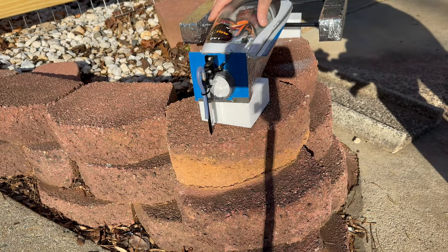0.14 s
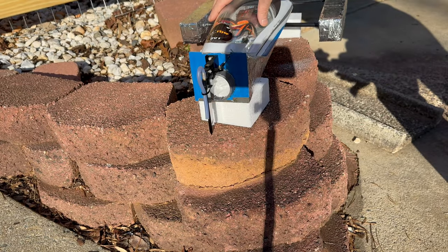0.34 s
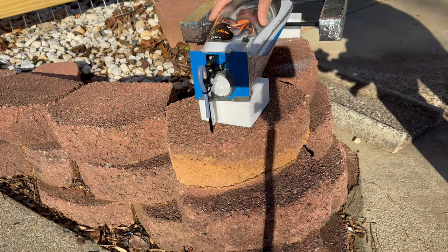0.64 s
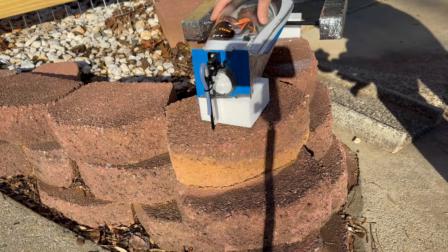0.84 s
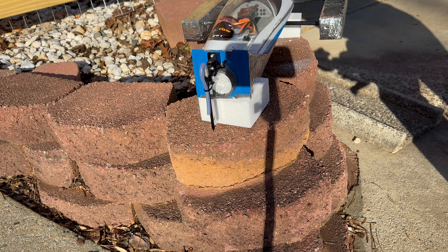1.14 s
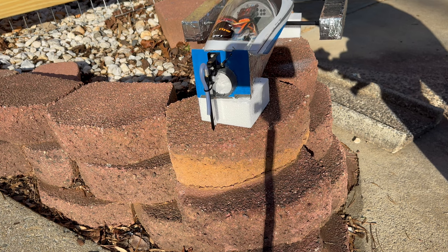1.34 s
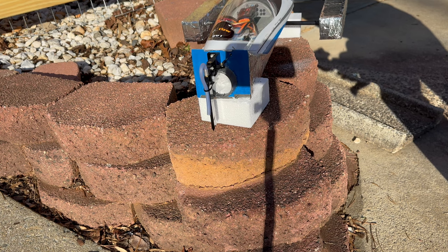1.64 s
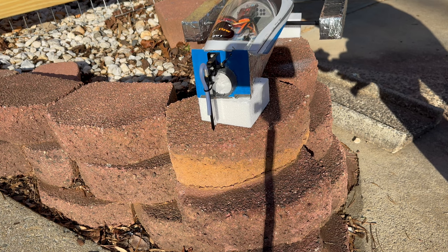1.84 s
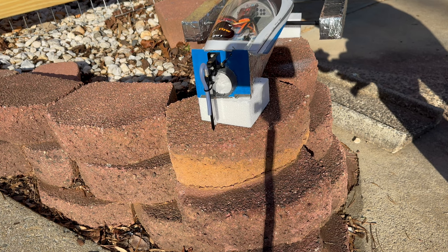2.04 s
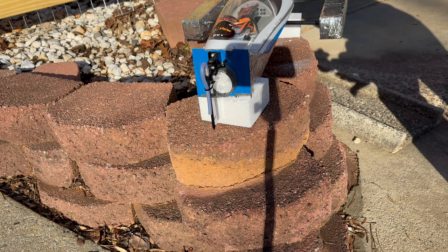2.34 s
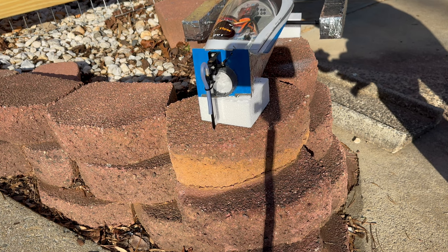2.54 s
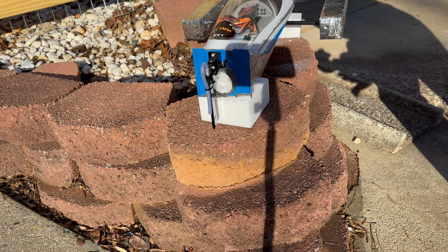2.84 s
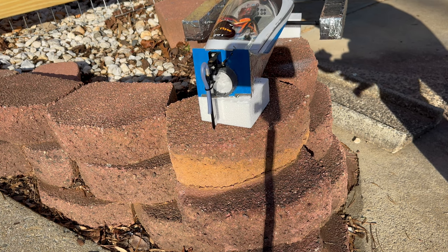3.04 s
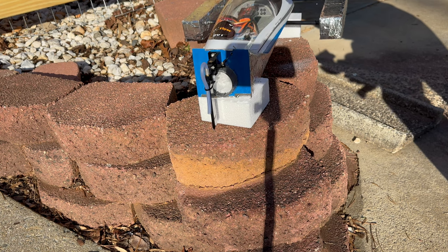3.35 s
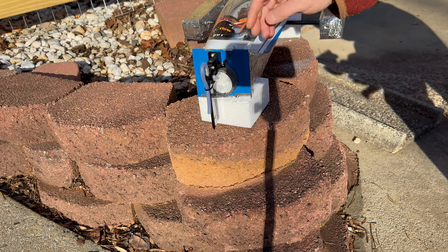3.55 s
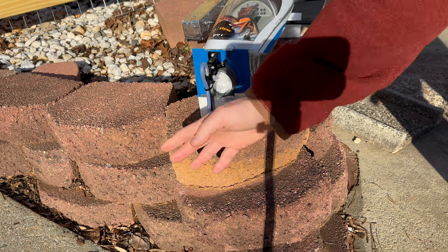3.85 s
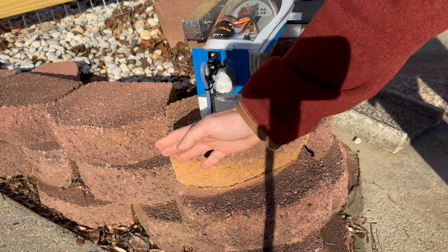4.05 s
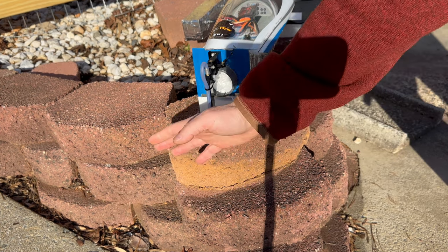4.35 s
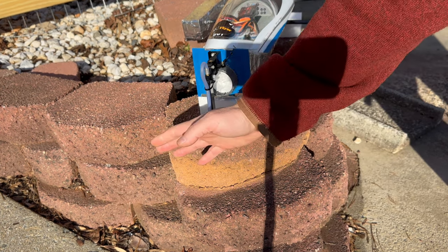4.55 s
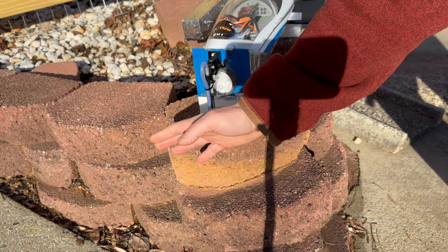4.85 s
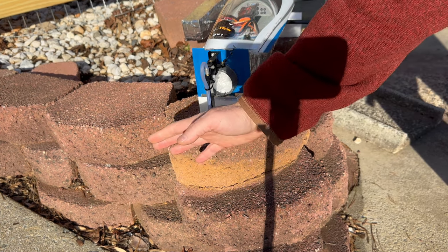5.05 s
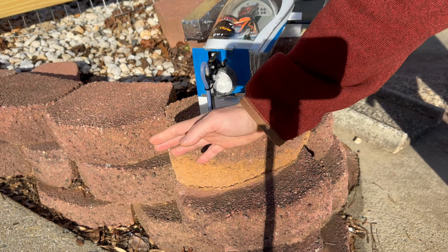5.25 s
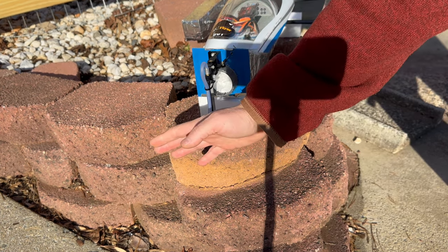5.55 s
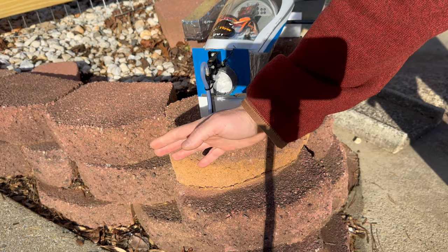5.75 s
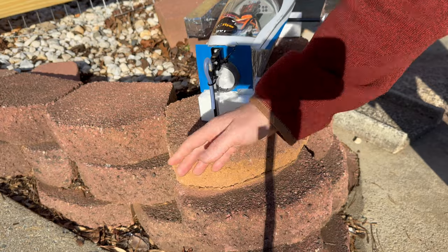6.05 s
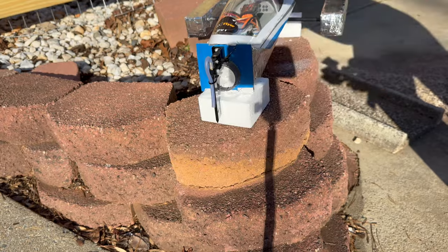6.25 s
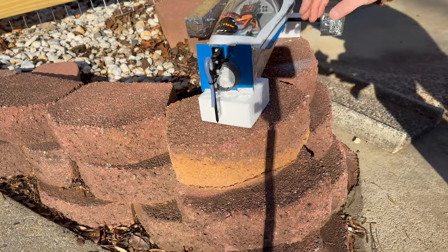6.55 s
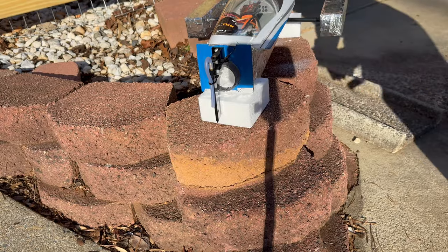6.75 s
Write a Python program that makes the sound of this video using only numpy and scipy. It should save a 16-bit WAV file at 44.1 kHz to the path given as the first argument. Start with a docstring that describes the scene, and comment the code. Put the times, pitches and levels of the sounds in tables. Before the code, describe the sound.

A small electric ducted fan whines and rushes up to full speed, coasts down and repeats three times outdoors, with wind rumbling on the microphone.

```python
"""A small electric ducted fan, standing on a stone wall outdoors, is throttled up and down three times.
The unbalanced rotor hums once per turn and turbulent air rushes through the resonant duct.
The motor's cogging whines as it spins up and coasts to rest; its speed controller whistles above.
The motor mount rings as the rotor jerks, and a hand in the airstream recolours the rush.
Breeze, gusts and sharp puffs rumble on the two microphone ports, over filtered background noise."""
import sys
import numpy as np
from scipy import signal
from scipy.fft import rfft, irfft
from scipy.io import wavfile
from scipy.ndimage import uniform_filter1d

SR = 44100
rng = np.random.default_rng(int(sys.argv[2]) if len(sys.argv) > 2 else 0)


def transcribe(u):
    """Save the signal u as a 16-bit wav file named by the first command-line argument.

    u: samples, shape (n,) or (channels, n), limited to [-1, 1]; the rate is SR.
    q: integer samples, one column per channel.
    """
    v = np.clip(np.atleast_2d(u).T, -1, 1)
    q = np.round(v * 32767).astype(np.int16)
    wavfile.write(sys.argv[1], SR, q)


N = 303540
TIME = np.arange(N) / SR
BINS_HZ = np.maximum(np.fft.rfftfreq(N, 1 / SR), 1)


def from_db(db):
    """Logarithmic level: decibels to amplitude gain."""
    return 10 ** (np.asarray(db) / 20)


def rms_one(x):
    """Normalisation: scale a signal to unit rms."""
    return x / np.sqrt(np.mean(x ** 2) + 1e-20)


def in_time(rows):
    """Linear interpolation: the columns of a time curve at every sample."""
    seconds, *columns = np.transpose(rows)
    return [np.interp(TIME, seconds, column) for column in columns]


def at_hz(rows, hz):
    """Interpolation on a logarithmic pitch axis: the columns of a spectrum at the given frequencies."""
    points, *columns = np.transpose(rows)
    log_hz = np.log(np.maximum(hz, 1))
    return [np.interp(log_hz, np.log(points), column) for column in columns]


def at_speed(rows, speed):
    """Linear interpolation: the columns of a table at the given rotor speeds."""
    points, *columns = np.transpose(rows)
    return [np.interp(speed, points, column) for column in columns]


def by_power(driven, driven_db, coasting_db):
    """Linear blend between the level under power and the level when coasting."""
    return coasting_db + driven * (driven_db - coasting_db)


def drift(rate_hz):
    """Low-pass filtered noise: slow random wandering with standard deviation 1."""
    spectrum = rfft(rng.standard_normal(N))
    return rms_one(irfft(spectrum / (1 + (BINS_HZ / rate_hz) ** 2), N))


def panned(x, balance_db):
    """Intensity stereo: split a left-right level difference evenly between the channels."""
    return x * from_db(np.array([balance_db, -balance_db]).reshape(2, -1) / 2)


def ring(force, hz, t60):
    """Damped resonator: a unit impulse sets a sine of initial height 1 decaying by 60 dB in t60 seconds."""
    radius = from_db(-60 / (t60 * SR))
    angle = 2 * np.pi * hz / SR
    feedback = [1, -2 * radius * np.cos(angle), radius * radius]
    return signal.lfilter([0, np.sin(angle)], feedback, force + 1e-18)


def port_difference(hz):
    """Partial coherence: sizes of the phase-shifted and the diffuse part of the port difference."""
    # the ports hear the sound out of step: (frequency [Hz], difference over sum [dB])
    port_width = [(60, -12), (150, -10), (380, -14), (750, -9), (1300, -11), (2400, -8), (3400, -3.5),
                  (4600, -3.5), (8100, 3), (10500, -2), (15000, -4)]
    steady_share = 0.62  # share of the difference power that is a steady phase shift
    width = from_db(at_hz(port_width, hz)[0])
    return width * np.sqrt(steady_share), width * np.sqrt(1 - steady_share)


def stereo_noise(colour_db, band=slice(None)):
    """Filtered Gaussian noise at two ports; the part common to both has unit rms inside the band."""
    # the sound sits a little to the left: (frequency [Hz], left-right level [dB])
    port_balance = [(60, 0), (150, 1), (380, 2), (750, 5.5), (1400, 1.5), (4000, 0.5), (15000, 0)]
    common, apart = rfft(rng.standard_normal((2, N))) * from_db(colour_db)
    shifted, diffuse = port_difference(BINS_HZ)
    # the port that leads alternates with frequency
    lead = np.cos(np.pi * np.log2(BINS_HZ)) * np.sqrt(2)
    side = 1j * shifted * common * lead + diffuse * apart
    ports = panned(np.array([common + side, common - side]), at_hz(port_balance, BINS_HZ)[0])
    return irfft(ports, N) * N / np.sqrt(2 * np.sum(np.abs(common[band]) ** 2))


def tone(hz, blur_hz):
    """Phase is the integral of frequency: a trembling stereo sine; the mean of its ports has rms 1."""
    phase = 2 * np.pi * np.cumsum(hz + blur_hz * drift(60)) / SR
    side = port_difference(hz)[0] * np.cos(phase)
    return np.sqrt(2) * (np.sin(phase) + np.array([-side, side]))


def throttle():
    """Drag and inertia: the drive sets the speed until each cut, then drag runs the rotor down to rest.
    Returns the speed, power on (0-1), fan level offset and hum level offset in dB."""
    # rotor speed under power, cut at the last point: (time [s], speed [turns/s])
    first_run = [(0, 246), (.06, 285), (.2, 458), (.3, 579), (.36, 639), (.42, 680), (.48, 711), (.55, 721),
                 (.652, 724)]
    second_run = [(1.335, 48), (1.385, 39.5), (1.425, 48), (1.51, 138), (1.6, 185), (1.65, 217),
                  (1.72, 325), (1.93, 600), (2.0, 660), (2.07, 705), (2.15, 724), (2.622, 724)]
    third_run = [(3.81, 1), (3.92, 141), (4.0, 170), (4.05, 208), (4.1, 278), (4.26, 392), (4.4, 441),
                 (4.5, 452), (4.83, 447), (4.93, 483), (5.0, 491), (5.1, 480), (5.33, 513), (5.44, 542),
                 (5.56, 543), (5.64, 558), (5.77, 653), (5.85, 702), (5.92, 721), (6.003, 720)]
    # (speed curve, drive engages [s], coasting time [s], fan level when coasting [dB], hum level [dB])
    runs = [
        (first_run, 0, 0.97, 0.5, 0.8),
        (second_run, 1.44, 0.97, 0, -0.5),
        (third_run, 3.805, 0.935, -1.84, -0.5),
    ]
    coast_power = 2.23  # coasting speed goes as the time left raised to this power
    speed, driven, coasting_db, hum_db = np.zeros((4, N))
    for curve, engage_s, coast_s, run_coasting_db, run_hum_db in runs:
        start_s = curve[0][0]
        cut_s, top_speed = curve[-1]
        time_left = np.clip(1 - (TIME - cut_s) / coast_s, 0, 1)
        coast = top_speed * time_left ** coast_power
        run_speed = np.where(TIME < cut_s, in_time(curve)[0], coast)
        speed = np.where(TIME < start_s, speed, run_speed)
        driven = np.where(TIME < engage_s, driven, TIME < cut_s)
        coasting_db = np.where(TIME < cut_s, coasting_db, run_coasting_db)
        hum_db = np.where(TIME < start_s, hum_db, run_hum_db)
    driven = uniform_filter1d(driven, size=500)
    speed = np.maximum(uniform_filter1d(speed, size=900), 1)  # inertia rounds every change
    return speed, driven, coasting_db * (1 - driven), hum_db


def hand_share():
    """Partial obstruction of a jet: how far the hand is in the airstream (0-1)."""
    # (time [s], share in the airstream [0-1])
    hand_curve = [(3.6, 0.02), (3.9, 1), (5.5, 0.71), (6.05, 0), (6.3, 0.35)]
    return np.clip(in_time(hand_curve)[0], 0, 1)


def rotor(speed, driven):
    """Forced vibration: unbalance shakes the housing once per turn, with speed-dependent weak overtones."""
    # once-per-turn hum: (speed [turns/s], base level [dB], base left-right level [dB])
    hum_levels = [(199, -67.5, 8), (330, -52, 2), (383, -49, 7), (406.6, -33.5, 5), (441, -34.5, 2.5),
                  (479.3, -22.5, 3.5), (515, -15.5, 2), (600, -13.5, 0), (696, -14, 3.5), (704, -16.5, 4),
                  (727, -19.5, 2)]
    # (multiple of the speed, then the base level [dB] at each of the overtone speeds)
    overtones = [(2, -80, -49, -48, -47, -43), (3, -80, -51, -39, -37, -39), (6, -80, -60, -53, -51, -52),
                 (9, -80, -62, -56, -54, -46), (12, -80, -49, -46, -52, -39)]
    # speeds at which the overtone levels are given [turns/s]
    overtone_speeds = [330, 460, 550, 660, 720]
    hum_coasting_db, hum_hand_db = -0.5, 5.5  # change with the power off; with the hand in the airstream
    overtone_hand_db = 2  # the hand brings the overtones out

    hand = hand_share()
    level_db, balance_db = at_speed(hum_levels, speed)
    level_db = level_db + hum_coasting_db * (1 - driven) + hum_hand_db * hand
    hum = panned(tone(speed, blur_hz=0.4), balance_db + 0.6 * drift(4.2))
    out = hum * from_db(level_db + 0.15 * drift(25))
    for multiple, *levels_db in overtones:
        overtone_db = np.interp(speed, overtone_speeds, levels_db)
        overtone_db = overtone_db + overtone_hand_db * hand + 3 * drift(22)
        overtone = tone(multiple * speed, blur_hz=4) * from_db(overtone_db)
        out = out + overtone * (speed > overtone_speeds[0])
    return out


def rush(speed, driven):
    """Turbulence excites duct resonances: broadband noise grows with rotor speed and changes its colour."""
    # colour: (frequency [Hz], relative density idling [dB per Hz], at half speed, at full speed)
    rush_colour = [(102, -5, -6.5, -7.5), (248, 9.5, 10.5, 3.5), (340, 3, -0.5, 1), (613, 17.5, 14.5, 12),
                   (734, 7.5, 4.5, 1), (1510, 8, 6.5, 6.5), (2310, 8.5, 3, 2), (3100, 6, 7.5, 2.5),
                   (4756, -3.5, 2, 2), (6620, -1.5, -3, 2), (7860, -11, -5.5, -5.5), (9930, -1, 4.5, 4),
                   (13300, -12.5, -1.5, -0.5), (15700, -14, -6, -4.5)]
    # the three speeds of those colours [turns/s]
    colour_speeds = [240, 461.6, 727]
    # resonances and hollows of the duct: (centre [Hz], width [Hz], gain [dB])
    duct_modes = [(1930, 210, 0), (2050, 320, 3), (2380, 68, 3.5), (2645, 88, 5.5), (3070, 400, -6.5),
                  (3063, 110, 9.5), (3257, 100, 5), (3710, 110, -6.5), (4220, 150, 3), (4670, 720, 1),
                  (5160, 230, -3.5), (5750, 1300, 1.5)]
    # (speed [turns/s], base 3.5-7 kHz level driven [dB], the same coasting [dB], treble gain less 4 dB [dB])
    air_levels = [(1, -99, -102, -4), (60, -70.5, -77.5, -1), (163, -62, -67, -2), (261, -54, -57, -2),
                  (415.6, -40.5, -44, -6.5), (501.7, -34.5, -37.5, -7.5), (652, -30, -29, -7),
                  (782, -25.5, -26.5, -8.5)]

    driven_db, coasting_db, treble_db = at_speed(air_levels, speed)
    duct_db = sum(db / (1 + (2 * (BINS_HZ - hz) / width) ** 2) for hz, width, db in duct_modes)
    reference = (BINS_HZ > 3500) & (BINS_HZ < 7000)
    air = 0
    for colour_db, stage in zip(at_hz(rush_colour, BINS_HZ), np.eye(len(colour_speeds))):
        share = np.interp(speed, colour_speeds, stage)  # power share of this colour
        air = air + np.sqrt(share) * stereo_noise(colour_db + duct_db, reference)
    treble_filter = signal.butter(4, 8000, "high", fs=SR, output="sos")
    hiss = signal.sosfiltfilt(treble_filter, air)
    air = air + hiss * (from_db(treble_db + 4.0) - 1)
    # the wake pulses once per turn and flutters at random
    turn = np.sin(2 * np.pi * np.cumsum(speed) / SR)
    level_db = by_power(driven, driven_db, coasting_db) + 0.67 * drift(40)
    return air * from_db(level_db) * (1 + 0.066 * turn)


def motor(speed, driven):
    """Cogging torque: magnets passing stator slots give gliding tones that swell at housing resonances.
    Under power one tone leads; the free rotor rattles with many."""
    # magnetic and bearing tones: (multiple of the speed, relative level coasting [dB], driven [dB])
    cogging = [(3, -20, -20), (6, -7, -15), (9, 1, 0), (10, -4, -15), (12, -8, -17), (18, -4, -7),
               (24, -26, -14), (27, -12, -18), (36, -9, -15), (72, -29, -32)]
    # whine: (speed [turns/s], base level driven [dB], coasting [dB])
    whine_levels = [(1, -69, -78), (10, -50, -39), (25, -44, -47.5), (50, -49, -50.5), (95, -50.5, -58),
                    (164.6, -50.5, -53.5), (168, -38, -54.5), (223, -42, -52.5), (318, -39, -43),
                    (420, -47, -49.5), (724, -52, -49)]
    # radiation of vibration by the housing: (frequency [Hz], gain [dB])
    housing = [(250, -73), (450, -9), (620, -4.5), (820, 13), (1050, -1.5), (1400, -5.5), (1900, -0.5),
               (2900, -6), (3500, -12.5), (4700, -18.5), (5900, -7.5), (8000, -15.5), (9800, -14),
               (10400, 2.5), (11200, -12.5), (16000, -15.5)]

    turn = 2 * np.pi * np.cumsum(speed) / SR
    # the rotor runs slightly off centre, so each tone flutters once per turn
    wobble = np.interp(driven, [0, 1], [0.4, 0.3])
    out = 0
    for multiple, coasting_db, driven_db in cogging:
        hz = multiple * speed
        level_db = by_power(driven, driven_db, coasting_db) + at_hz(housing, hz)[0]
        flutter = 1 + wobble * np.sin(turn + rng.uniform(0, 2 * np.pi))
        partial = tone(hz, blur_hz=0.003 * hz + 6)
        out = out + partial * from_db(level_db + 3.8 * drift(28)) * flutter
    return out * from_db(by_power(driven, *at_speed(whine_levels, speed)))


def controller(speed, driven):
    """Intermodulation: switching mixes with rotation into whistles that fall as the rotor speeds up."""
    # whistles below the switching rate: (multiple of the speed, relative level [dB])
    sidebands = [(6, -15), (12, 0), (18, -19)]
    # (speed [turns/s], base whistle level driven [dB], coasting [dB])
    whistle_levels = [(1, -80, -100), (25, -76, -80), (110, -62, -77), (180, -70, -74), (293, -47, -64),
                      (393, -64.5, -60)]
    # faint steady tones of the electronics: (frequency [Hz], base level [dB])
    electronics = [(5920, -83.5), (9430, -77.5)]
    switching_hz = 16000

    whistle_db = by_power(driven, *at_speed(whistle_levels, speed)) + 3 * drift(30)
    whistles = sum(from_db(db) * tone(switching_hz - multiple * speed, blur_hz=60)
                   for multiple, db in sidebands)
    steady = sum(from_db(db) * tone(np.full(N, hz), blur_hz=3.2) for hz, db in electronics)
    # the steady tones fade out below 20 turns/s
    return whistles * from_db(whistle_db) + steady * np.clip(speed / 20, 0, 1)


def wind(puff_cycles=2.4, gust_rise_s=0.022):
    """Turbulent pressure on the microphone: lumpy breeze, fast-rising gusts and sharp damped low puffs."""
    # spectrum of the rumble: (frequency [Hz], relative density [dB per Hz])
    wind_colour = [(15, -44.5), (30, -24), (50, -0.5), (72, 2), (125, -4.5), (220, -15.5), (400, -31),
                   (1000, -48.5), (4000, -80.5)]
    # light breeze: (time [s], level before a 1 dB cut and a random swing [dB])
    breeze = [(0.0, -57.5), (0.15, -57), (0.59, -45.5), (0.84, -43), (1.07, -57), (1.61, -65),
              (1.82, -52.5), (2.87, -37), (3.05, -46), (3.6, -57.5), (4.66, -42.5), (6.32, -38.5),
              (6.53, -45), (6.88, -45)]
    # gusts: (time of peak [s], peak level [dB], dying time constant [s])
    gusts = [(1.68, -42, .06), (2.58, -31.5, .07), (2.725, -19.5, .06), (3.003, -24, .05),
             (3.529, -40.5, .03), (3.925, -35.5, .04), (4.48, -30, .05), (4.79, -25.5, .03),
             (4.99, -33.5, .03), (5.23, -37, .04), (5.76, -29, .02), (6.02, -35.5, .03), (6.25, -24, .03),
             (6.311, -29, .07)]
    # sharp puffs: (onset [s], envelope peak [dB], frequency [Hz])
    puffs = [(2.573, -17.5, 71.6), (2.708, -13.5, 192), (2.744, -13, 143), (2.985, -16, 112),
             (3.018, -18, 182), (3.519, -34, 189.6), (3.908, -31, 60.3), (6.247, -22, 62)]

    power = from_db(in_time(breeze)[0] - 1 + 4 * drift(4.8)) ** 2
    for peak_s, db, dying_s in gusts:
        decay = np.maximum((peak_s - TIME) / gust_rise_s, (TIME - peak_s) / dying_s)
        power = power + (from_db(db) * np.exp(-decay)) ** 2
    rumble = stereo_noise(at_hz(wind_colour, BINS_HZ)[0]) * np.sqrt(power)
    for onset_s, db, hz in puffs:
        cycles = np.maximum(TIME - onset_s, 0) * hz
        swell = cycles * 5 / puff_cycles
        envelope = swell * np.exp(1 - swell)  # rises to 1, then dies away
        rumble = rumble + from_db(db) * envelope * np.sin(2 * np.pi * cycles)
    return rumble


def outdoors():
    """Diffuse background: stationary noise with a fixed spectrum, strongest at low frequencies."""
    # (frequency [Hz], relative density [dB per Hz])
    outdoor_colour = [(30, 10.5), (120, -3), (250, -8), (450, -14.5), (850, -9), (1500, -18), (3000, -35.5),
                      (6000, -41), (16000, -35.5)]
    return from_db(-70.5) * stereo_noise(at_hz(outdoor_colour, BINS_HZ)[0])


def mount(speed, driven, contact_hz=1000):
    """Modal excitation: soft jerks and the rough drive at low speed ring the modes of the motor mount."""
    # jerks of the rotor as it catches or stops: (time [s], strength [dB])
    jerks = [(1.459, -43), (3.501, -58), (3.805, -47), (3.838, -36), (3.867, -29.5), (3.896, -31),
             (3.927, -31.5), (6.85, -54)]
    # modes of the mount: (frequency [Hz], relative level [dB], 60 dB decay time [s])
    mount_modes = [(590, -27, .05), (796, -17, 0.023), (840, -1.5, 0.16), (1070, -24, .04),
                   (1480, -16, 0.025), (1794, -10.5, 0.033), (2500, -36, .025)]
    # rough drive: (speed [turns/s], level driven [dB], coasting [dB])
    buzz_levels = [(1, -57, -100), (50, -58, -80), (139, -46.5, -80), (220, -45, -77), (448, -68, -79.5)]

    blows = np.zeros(N)
    for s, db in jerks:
        blows[round(s * SR)] = from_db(db)
    # a soft contact low-passes each blow
    blows = signal.sosfilt(signal.butter(2, contact_hz, fs=SR, output="sos"), blows)
    chatter = rng.standard_normal(N) * from_db(4.0 * drift(50))
    knocks = sum(from_db(db) * ring(blows, hz, t60) for hz, db, t60 in mount_modes)
    buzz = sum(from_db(db) * ring(chatter, hz, t60) for hz, db, t60 in mount_modes)
    buzz_db = by_power(driven, *at_speed(buzz_levels, speed))
    return knocks + from_db(buzz_db) * rms_one(buzz)


def past_hand(air):
    """Jet deflection: the hand crossfades the rush into a recoloured, slightly shielded version."""
    # (frequency [Hz], gain before the shielding loss [dB])
    hand_colour = [(100, -0.5), (220, 5), (400, 7), (700, 5), (1100, 1.5), (1650, 4), (2200, 0.5),
                   (2900, 4), (4200, 0), (6500, 2), (10000, 3.5), (15000, 4)]
    shielding_loss_db = 2
    gain = from_db(at_hz(hand_colour, BINS_HZ)[0] - shielding_loss_db)
    deflected = irfft(rfft(air) * gain, N)
    return air + hand_share() * (deflected - air)


def scene():
    """Superposition: the fan, its mount, the wind and the outdoor background add linearly."""
    speed, driven, coasting_db, hum_db = throttle()
    fan = rotor(speed, driven) * from_db(hum_db)
    fan = fan + past_hand(rush(speed, driven))
    fan = fan + motor(speed, driven) + controller(speed, driven)
    fan = fan * from_db(coasting_db) + mount(speed, driven)
    return fan + wind() + outdoors()


def record(dry):
    """Band limiting: a steep elliptic low-pass removes the top above 15.75 kHz."""
    return signal.sosfilt(signal.ellip(12, 0.1, 80, 15750, fs=SR, output="sos"), dry)


dry = scene()
out = record(dry)
transcribe(out)
```